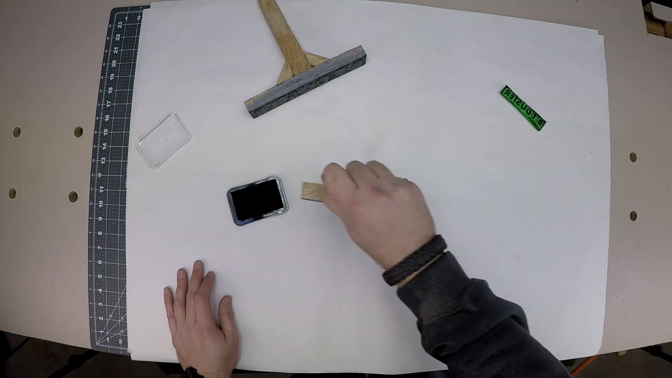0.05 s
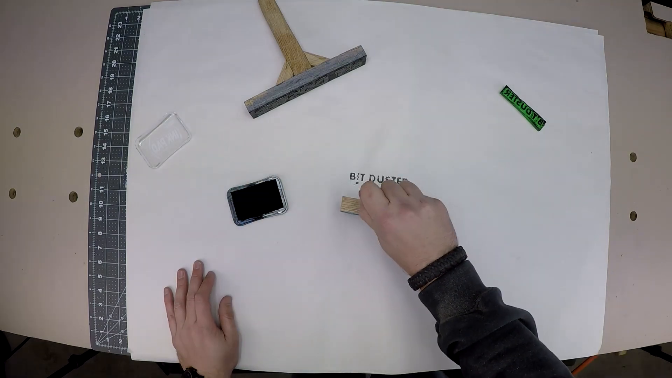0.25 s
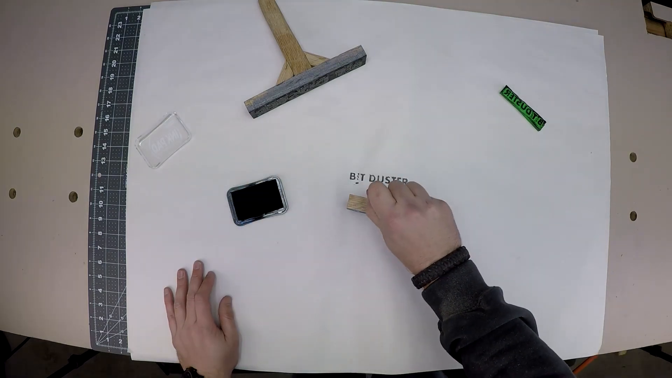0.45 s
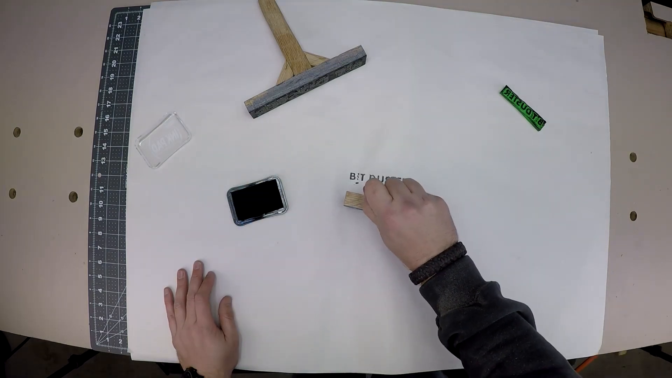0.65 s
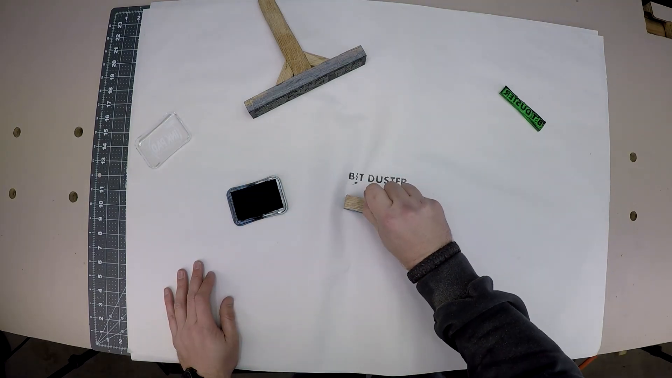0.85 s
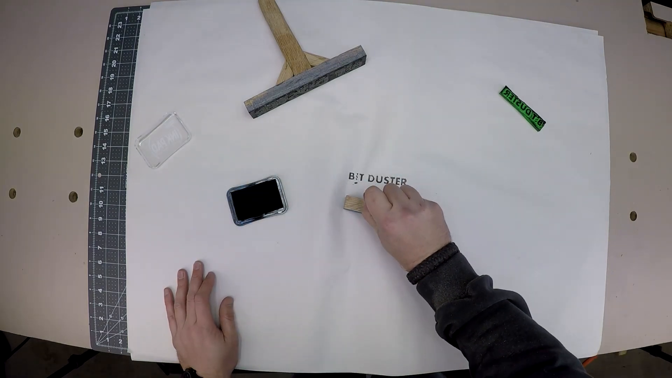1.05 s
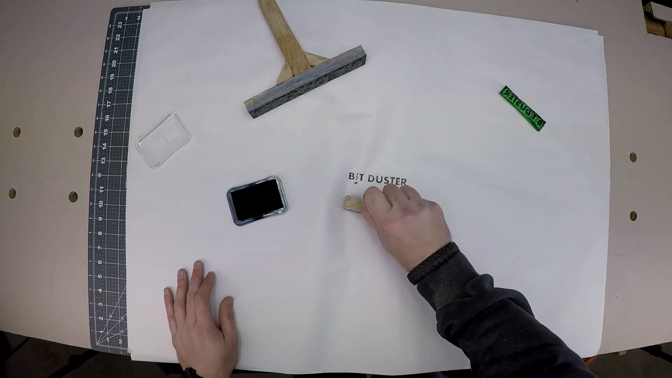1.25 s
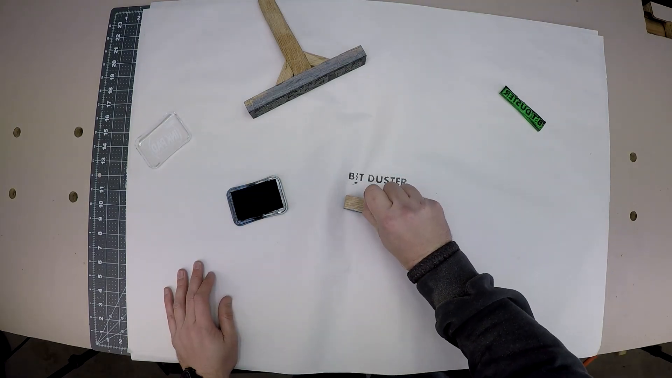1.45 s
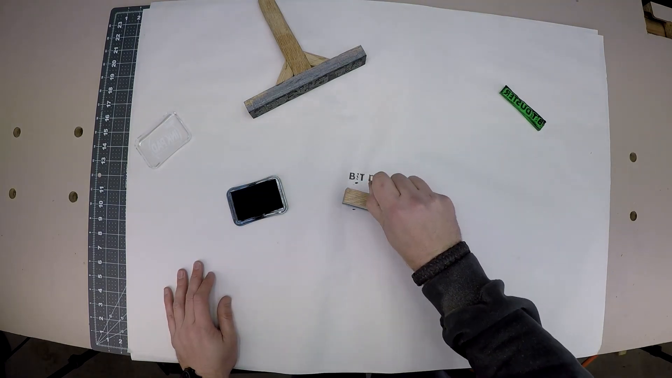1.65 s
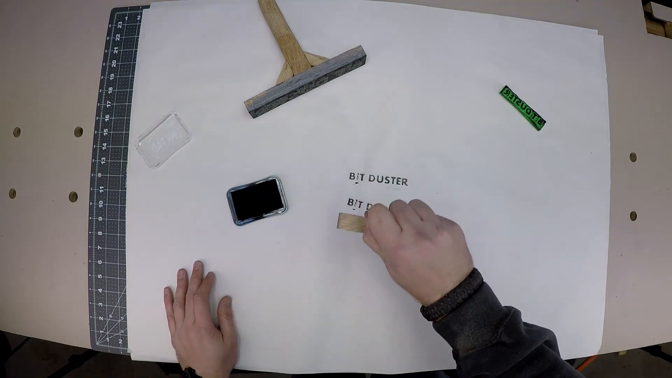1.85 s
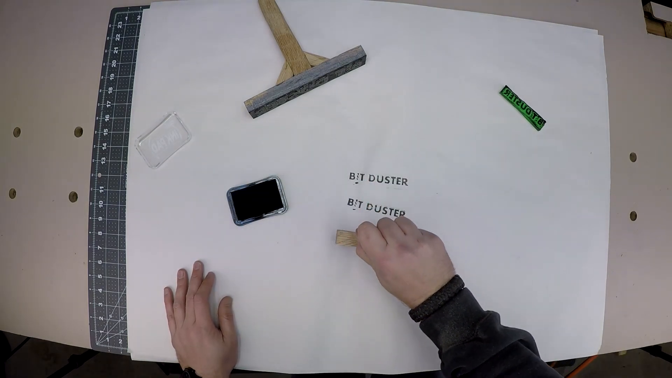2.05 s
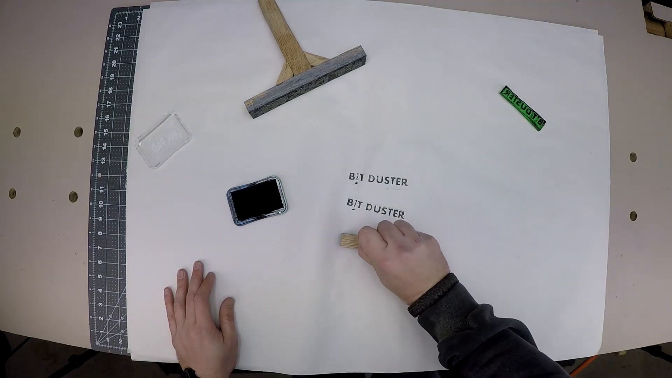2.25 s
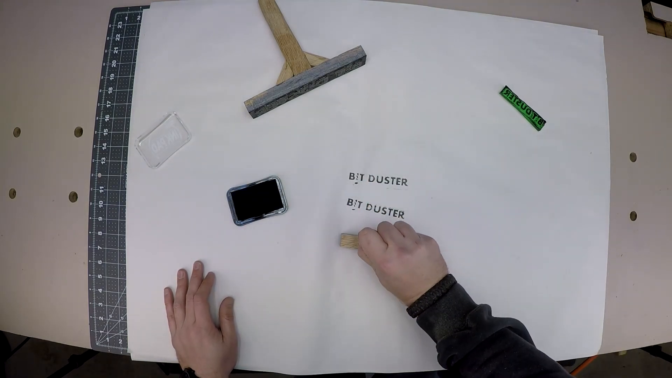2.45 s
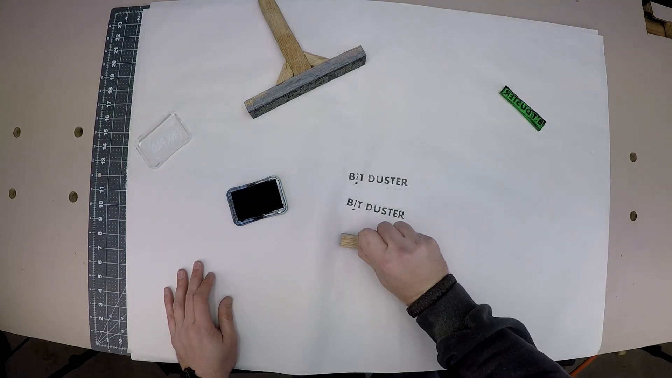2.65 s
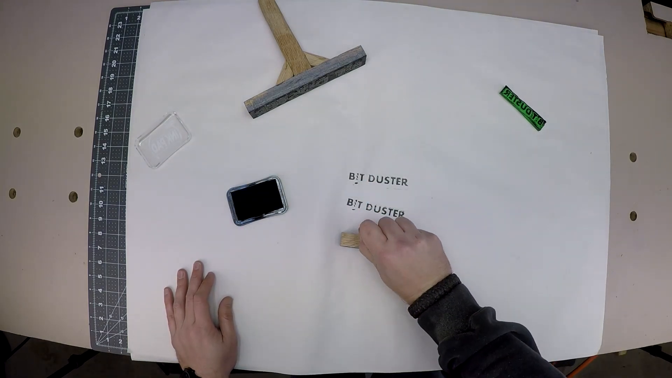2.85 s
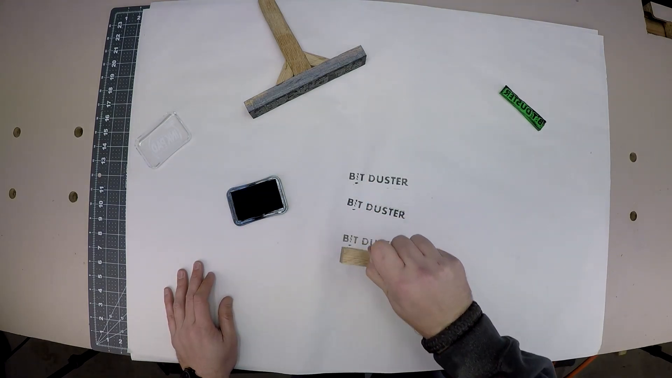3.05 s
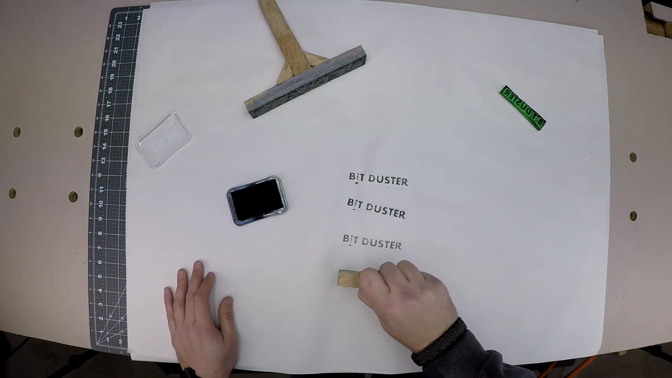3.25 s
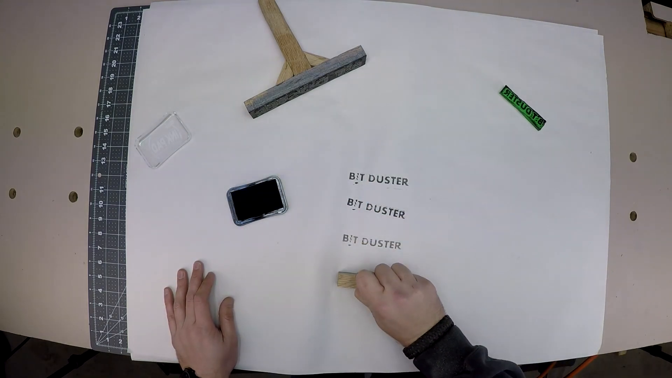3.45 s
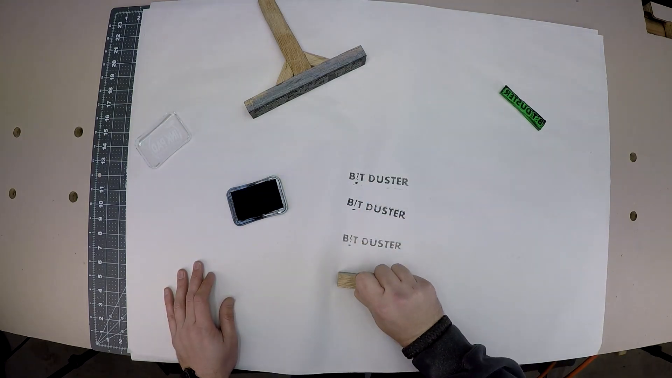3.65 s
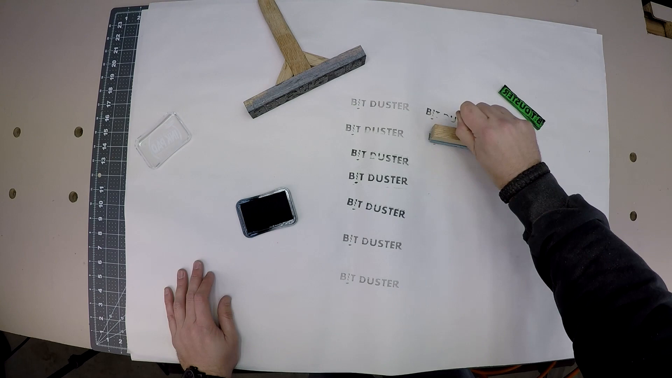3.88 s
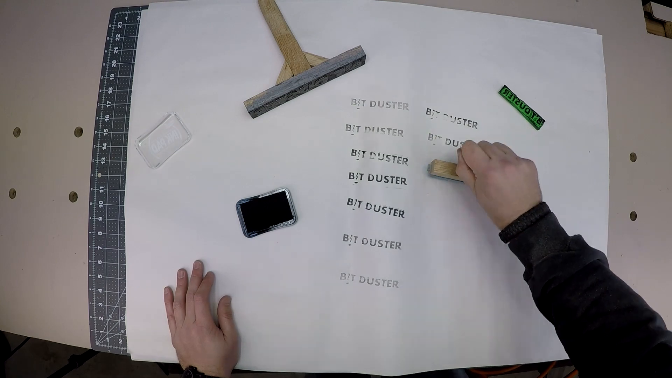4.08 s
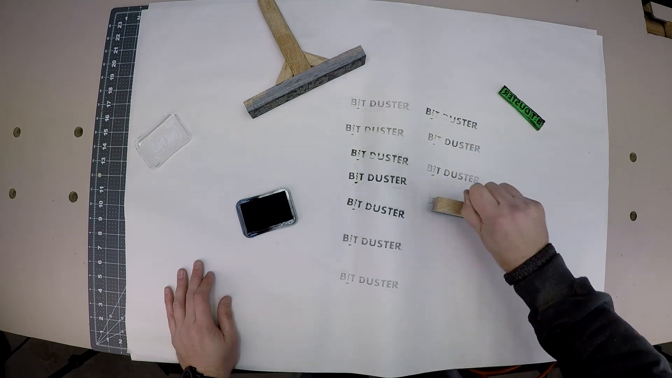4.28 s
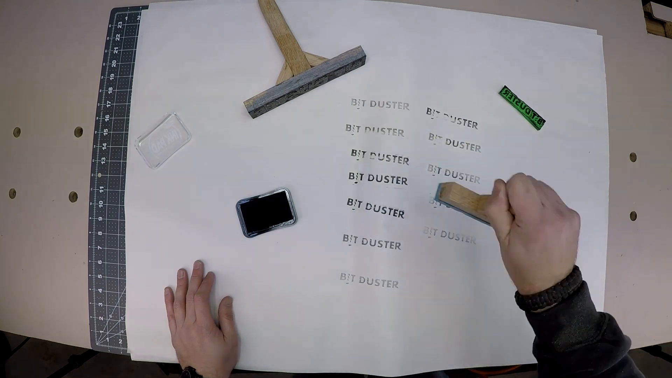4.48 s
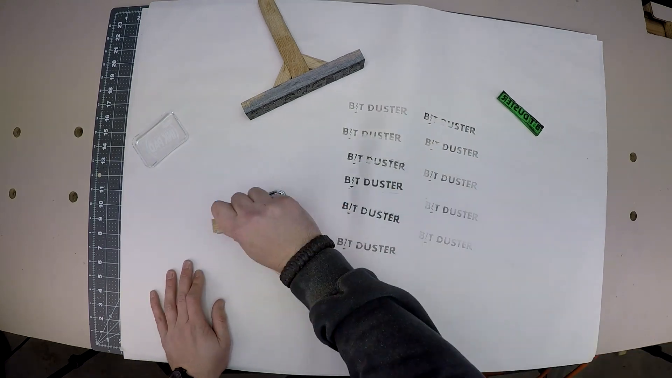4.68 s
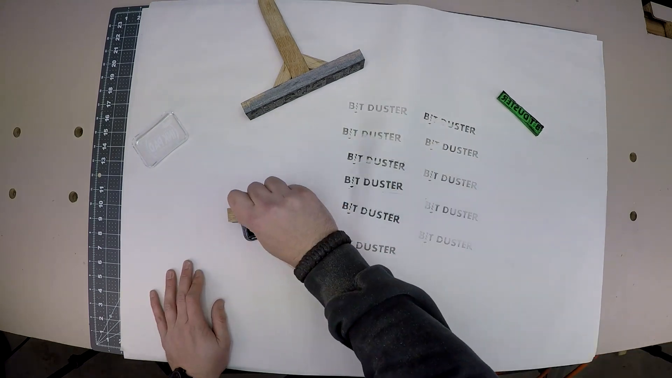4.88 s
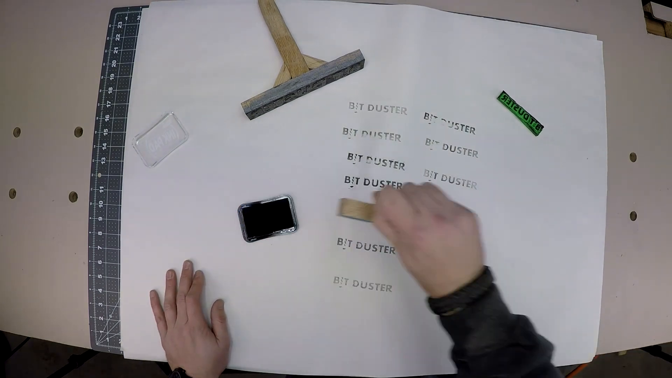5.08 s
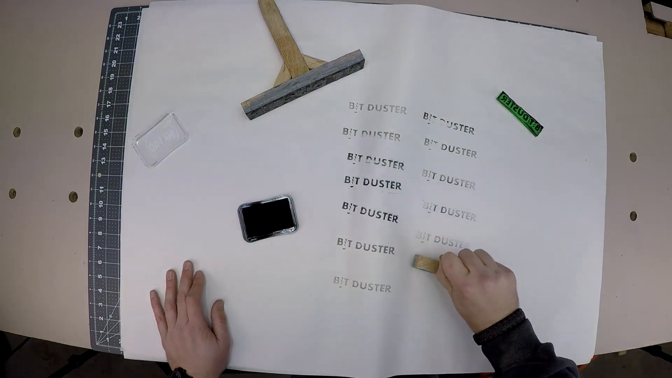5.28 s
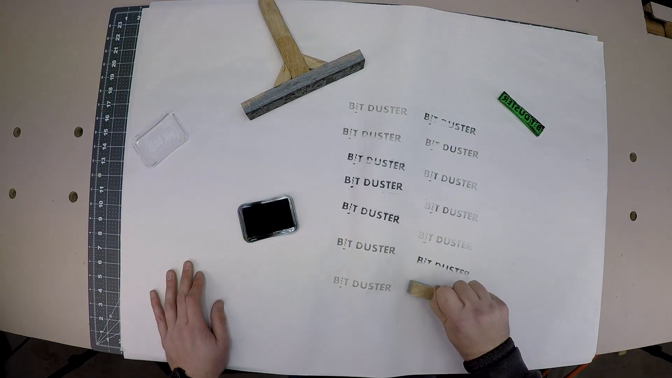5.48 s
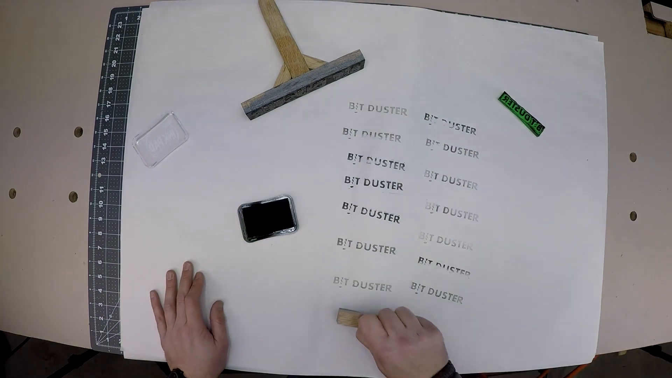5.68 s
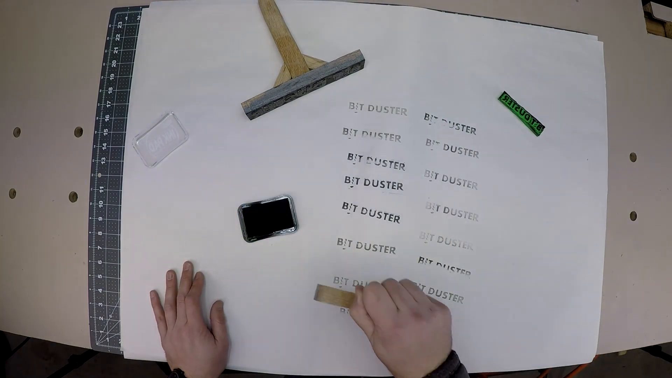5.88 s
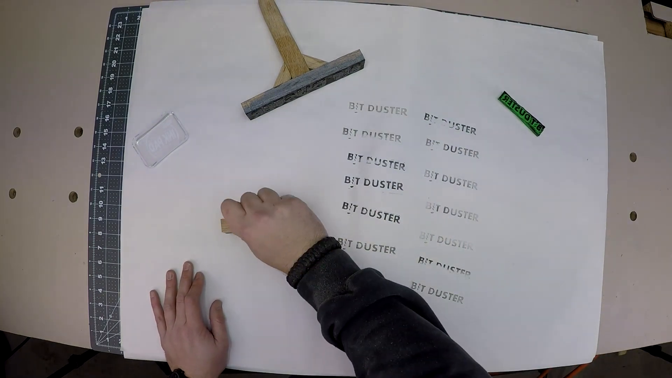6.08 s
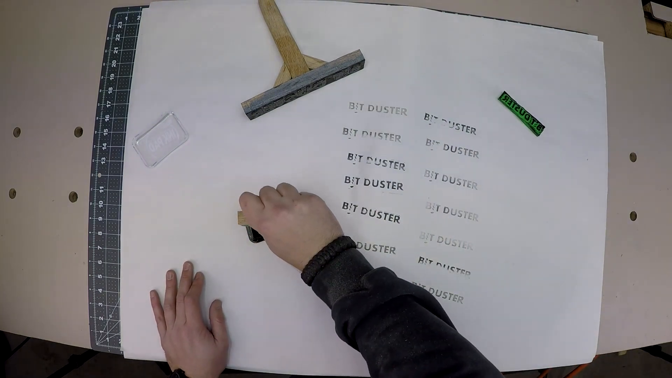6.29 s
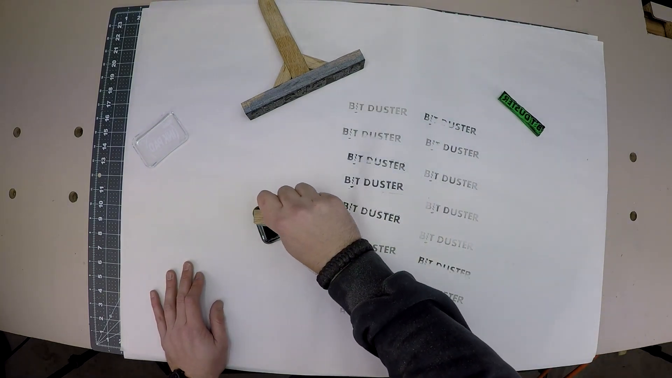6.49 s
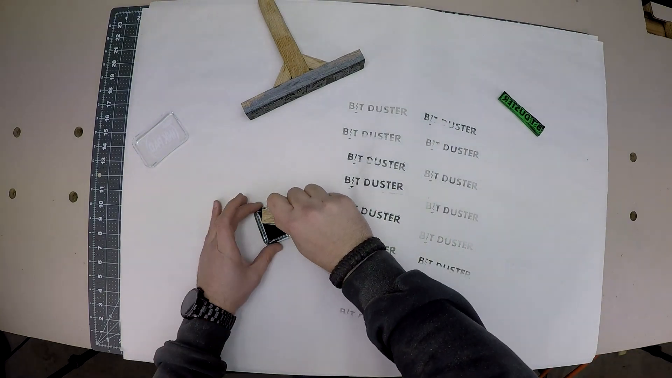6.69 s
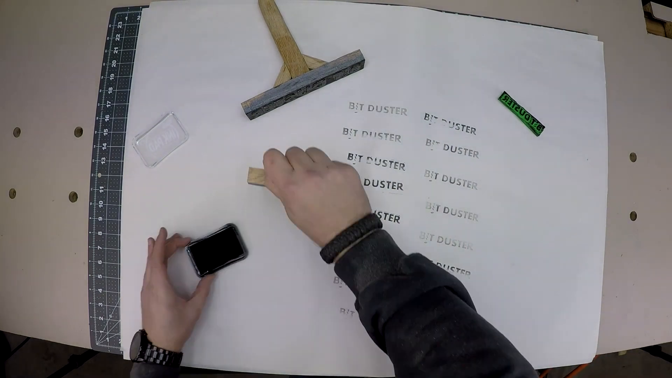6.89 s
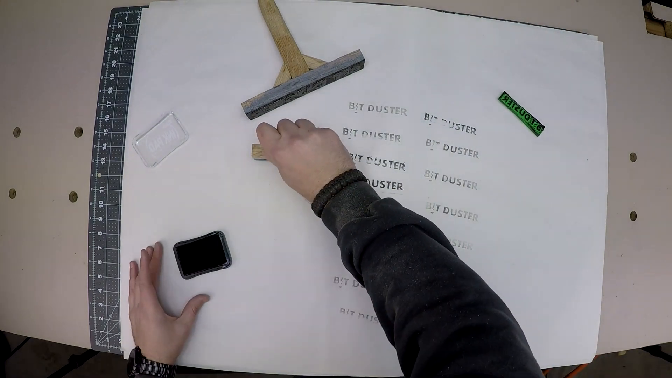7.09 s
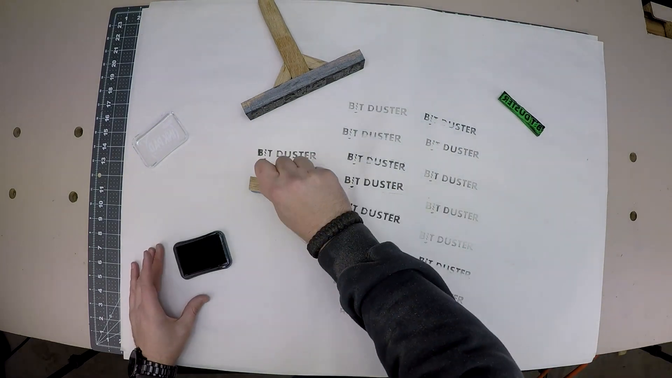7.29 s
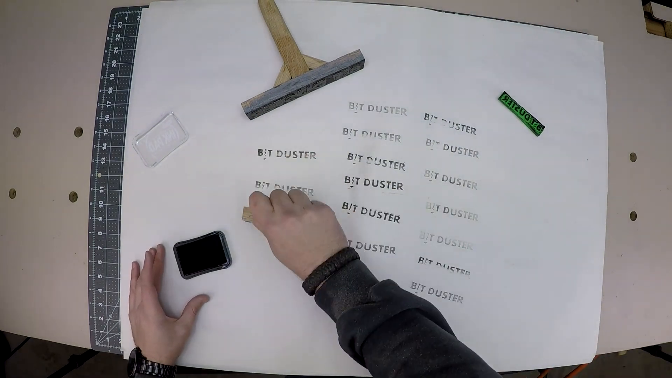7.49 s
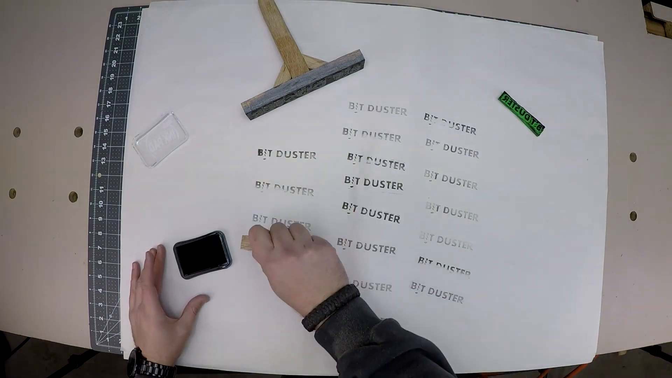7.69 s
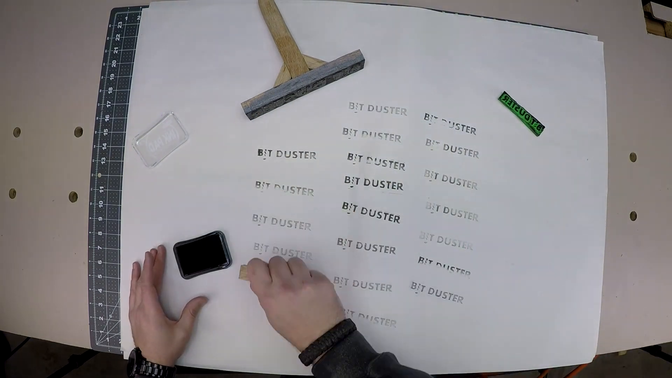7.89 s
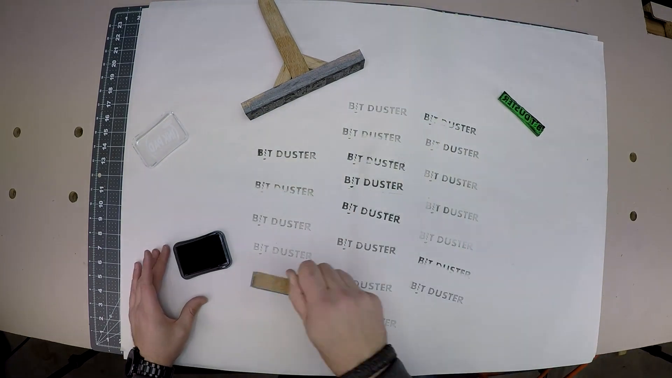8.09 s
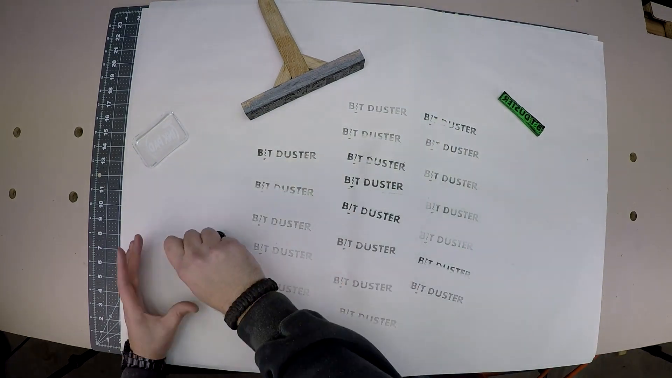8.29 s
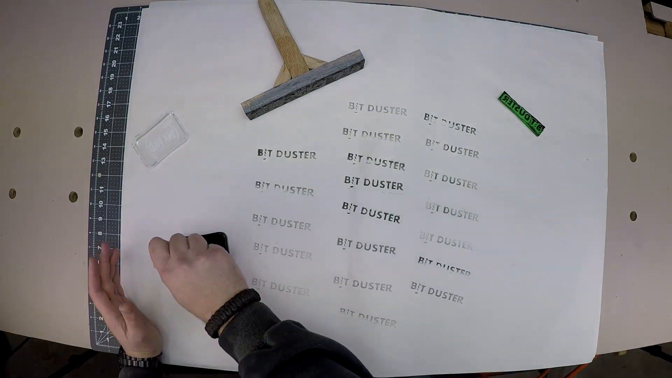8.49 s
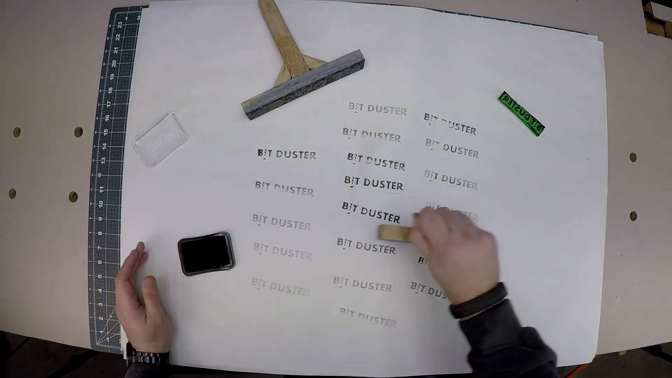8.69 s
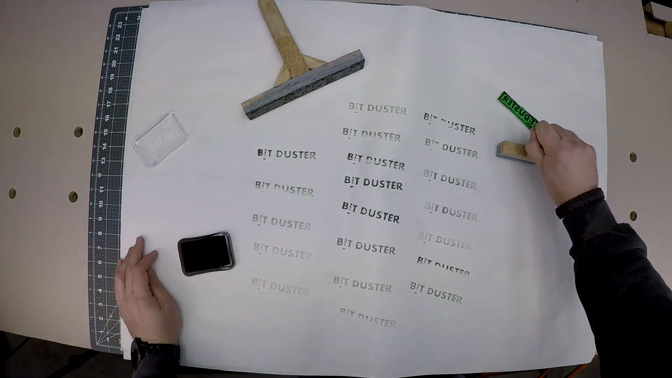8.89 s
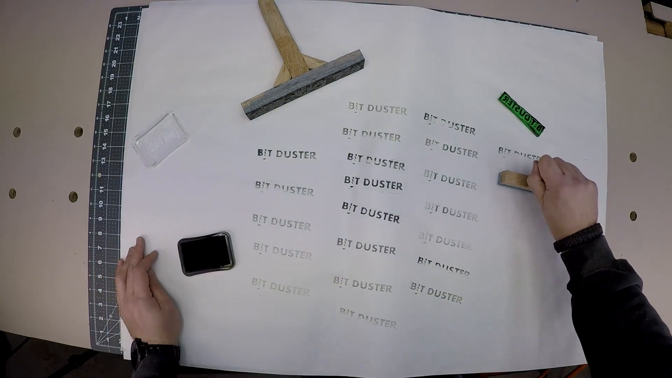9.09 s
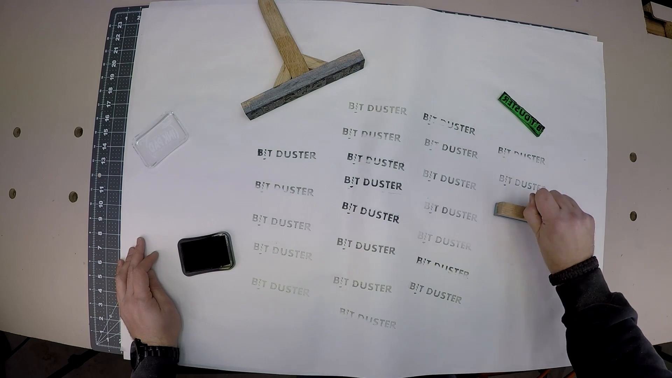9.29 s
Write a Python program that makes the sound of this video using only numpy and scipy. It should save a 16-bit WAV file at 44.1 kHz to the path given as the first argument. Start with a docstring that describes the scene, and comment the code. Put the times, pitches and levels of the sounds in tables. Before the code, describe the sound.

A steady low rumble with faint hiss lies under everything, heard close in a modest workshop. At 0.7 s a wooden rubber stamp strikes paper on a bench: sharp tick, flat slap, deep woody knock, brief ringing and room tail. Small scuffs and a tick come near 1.6 s, then equally firm blows at 2.1 and, slightly softer, 3.4 s. Three quicker, damped knocks follow at 3.9, 4.1 and 4.3 s, the last sharper. From 4.6 to 4.9 s the stamp patters on a felt ink pad in a plastic case. Knocks at 5.2, 5.4 and a heavier 5.7 s lead to a hard clack at 6.0 s and rapid soft dabs until 6.5 s. Scuffs and faint sleeve brushing precede five light, dull knocks from 7.0 to 7.9 s. More brushing and uneven dabs fill 8.2-8.6 s, then three brisk knocks at 8.8, 9.0 and 9.3 s.

```python
"""A low rumble with faint hiss runs throughout. A wooden rubber stamp hits paper on a workbench: three firm blows,
then quick light ones alternating with bouts of patter on an ink pad in a plastic case.
A blow sums grain-noise graze, slap and clack, damped-cosine knock and push, ringing bench modes and a room tail.
A dab sums a pat, a clack, a case thump, a push and a drag. Noise bursts make the ticks and scuffs around them;
soft brushing joins in the later part."""
import sys
import numpy as np
from scipy import signal
from scipy.fft import rfft, irfft, next_fast_len
from scipy.io import wavfile
from scipy.ndimage import uniform_filter1d

SR = 44100
rng = np.random.default_rng(int(sys.argv[2]) if len(sys.argv) > 2 else 0)


def wav_record(signal):
    """Record a signal, one row per channel, as 16-bit PCM in the file named by sys.argv[1]."""
    frames = np.transpose(np.atleast_2d(signal))
    bounded = np.clip(frames, -1, 1)
    # unit amplitude maps onto the largest positive 16-bit level
    quanta = np.round(bounded * 32767).astype(np.int16)
    wavfile.write(sys.argv[1], SR, quanta)


N = 411894

# All event and spectrum levels are relative: the layers below add their own offsets.
# Blows on paper: (time [s], bench push [dB], knock [dB], knock pitch [Hz], clack [dB], slap [dB])
BLOWS = [ (.679, -26.5, -32.5, 195, -33, -28.5), (2.081, -26.5, -27.5, 295, -26.5, -25.5),
         (3.353, -32, -31, 271, -35.5, -33), (3.935, -43.5, -35.5, 206, -43, -40.5),
         (4.122, -39, -35.5, 195, -42.5, -36.5), (4.313, -56, -27.5, 203, -30.5, -33),
         (5.202, -35, -37.5, 179, -44, -33.5), (5.422, -34.5, -38.5, 178, -40, -37.5),
         (5.674, -26.5, -27.5, 270, -42, -38.5), (6.969, -45, -38, 176, -66, -69),
         (7.231, -39, -36, 186, -57.5, -55.5), (7.47, -48, -40.5, 277, -62.5, -69),
         (7.686, -35, -35.5, 367, -52, -53), (7.883, -44.5, -32, 353, -49.5, -56),
         (8.83, -39.5, -32, 259, -51.5, -37), (9.044, -32, -32.5, 210, -40.5, -43),
         (9.255, -38, -35.5, 255, -56, -47.5)]
# Groups of blows sharing a clack pitch and a ring: (start [s], clack pitch [Hz], ring [share of free ring])
BLOW_GROUPS = [(0, 606, 1), (3.8, 1250, 0.41), (5.6, 520, 0.46), (8.7, 957, .42)]
# Dabs on the ink pad: (time [s], clack [dB])
PAD_DABS = [(4.612, -49), (4.661, -39.5), (4.758, -58), (4.818, -58), (4.928, -64), (5.969, -27.5),
            (6.027, -54), (6.08, -50), (6.139, -57), (6.197, -44.5), (6.241, -53.5), (6.377, -54),
            (6.434, -48), (6.484, -52), (8.233, -52), (8.309, -39), (8.356, -31.5), (8.424, -51.5),
            (8.48, -49), (8.541, -44), (8.555, -49)]
# Bouts of inking; in the last the other hand steadies the pad: (start [s], bench push [dB])
INKING_BOUTS = [(4.5, -40), (5.9, -44), (8.1, -50.5)]
# Felt pat against dab hardness: (level at a middling dab [dB], slope [dB per dB of clack])
PAT_LAW = (-64.5, 0.84)
# Case thump against dab hardness: (level at a middling dab [dB], slope [dB per dB of clack])
CASE_LAW = (-47, 0.88)
# Sharp ticks of wood and plastic: (time [s], level [dB], pitch [Hz], fade [s])
EDGE_TICKS = [(0.6654, -13.5, 2030, 0.00089), (.68, -35.5, 2150, 0.0036), (2.0841, -22, 2430, 0.0028),
              (1.592, -41, 3550, 0.00089), (1.675, -59, 3560, 0.0033), (4.313, -24.5, 1270, .0018),
              (5.969, -29.5, 2150, 0.0028)]
# Short scuffs, slides and a second slap, of rubber and case on paper or pad:
# (time [s], level [dB], pitch [Hz], length [s])
SHORT_CONTACTS = [(1.549, -50.5, 2030, .022), (1.605, -61.5, 1820, 0.027), (2.828, -61, 2020, 0.028),
                  (3.134, -65.5, 1740, 0.023), (4.238, -56, 1550, 0.017), (4.41, -54, 1520, 0.0093),
                  (4.495, -49.5, 1910, 0.029), (4.613, -54, 1850, 0.019), (5.214, -41, 2150, 0.015),
                  (5.54, -59, 1750, .006), (6.736, -62, 1096, 0.012), (6.886, -47.5, 1040, 0.013),
                  (6.929, -60, 3920, .02), (7.116, -44, 4620, 0.0066), (8.237, -49.5, 1440, 0.015)]
# Sleeve and hand brushing the sheet: (time [s], level [dB])
SLEEVE_BRUSHES = [(6.8, -74.5), (7.05, -72.5), (8.15, -72)]
# Bench-top modes: (frequency [Hz], level [dB], free t60 [s])
BENCH_MODES = [(53.7, -13.5, 0.91), (72.13, -12, 0.71), (117.3, -12, 0.36), (182, -5.5, 0.67),
               (275, -3.5, 0.47), (353, -5, 0.46), (404, -6.5, .55), (574, -8.5, 0.73), (718, -18, 1),
               (829, -8.5, .4), (990, -12.5, 0.66)]
# Workshop decay: (frequency [Hz], t60 before damping [s])
ROOM_DECAY = [(700, 0.62), (1300, 0.48), (4000, 0.5), (7000, 0.448), (14000, 0.03)]
# Soft face meeting paper or felt: (frequency [Hz], density [dB per Hz])
SLAP_SPECTRUM = [(200, -27), (650, -14.5), (1200, -12.5), (1900, -1), (2700, -5.5), (4300, -5.5),
                 (6300, -23), (9500, -24), (12500, -33), (16000, -51)]
# Steady room rumble and hiss: (frequency [Hz], density [dB per Hz])
RUMBLE_SPECTRUM = [(20, 3.5), (55, -10.5), (110, -2), (175, -9.5), (220, -22.5), (320, -18.5), (480, -23.5),
                   (900, -29), (2500, -32), (4000, -32.5), (6000, -38.5), (10500, -38.5), (15500, -44.5)]
# Block or case clack: (frequency [multiple of pitch], density [dB per Hz])
CLACK_SHAPE = [(.2, -23), (.5, -9), (.8, 4), (1.1, -0.5), (1.5, -3), (2.5, -16.5), (8, -68)]
# Hard-edge tick: (frequency [multiple of pitch], density [dB per Hz])
TICK_SHAPE = [(.15, 1), (.65, -15), (1, 11), (1.5, -5.5), (2.1, -8), (2.7, -20), (4, -23), (6, -31)]
# Rubbing and scuffing: (frequency [multiple of pitch], density [dB per Hz])
SCUFF_SHAPE = [(.2, -22), (.65, -4.5), (1, 6), (1.4, -6.5), (2.1, -4.5), (3.2, -17), (5.5, -17), (9, -28.5)]

LEAD_SAMPLES = SR // 8
T_S = (np.arange(SR) - LEAD_SAMPLES) / SR  # time around one contact
TOP_HZ = 15500
SLAP_LEAD_S = 0.0028  # rubber meets paper just before the block lands
MIDDLING_DAB_DB = -51.5  # louder dabs catch the case rim, softer ones sink into the felt
RISE_SHARE = 0.62  # share of a short contact's length spent building up


def amp(db):
    """Decibels to gain."""
    return 10 ** (np.asarray(db) / 20)


def along(points, hz):
    """Read (frequency, value) points on a log-frequency axis."""
    point_hz, values = np.transpose(points)
    return np.interp(np.log(hz + 1), np.log(point_hz), values)


def pitched(shape, hz):
    """Place a spectral shape around a pitch."""
    return [(multiple * hz, db) for multiple, db in shape]


def current(table, time_s):
    """Settings of the latest row begun by time_s."""
    begun = [row for row in table if row[0] <= time_s]
    return [table[0], *begun][-1][1:]


def add(track, time_s, sound):
    """Lay one contact into the track at its time."""
    start = round(time_s * SR) - LEAD_SAMPLES
    part = sound[:len(track) - start]
    track[start:start + len(part)] += part


def noise(spectrum, size):
    """Coloured noise of rms 1."""
    gain = amp(along(spectrum, np.fft.rfftfreq(size, 1 / SR)))
    x = irfft(rfft(rng.standard_normal(size)) * gain, size)
    return x / x.std()


def swell(rise_s, fade_s, lead_s=0, order=2):
    """Contact builds as faces meet, then dies away; high order: steep start, flat top."""
    t = T_S + lead_s
    rise = np.abs(np.minimum(t, 0) / rise_s) ** order
    fade = np.maximum(t, 0) / fade_s
    return np.exp(-rise - fade)


def burst(spectrum, envelope, grain_db):
    """Many tiny contacts of uneven strength, scaled to the envelope's energy."""
    grain_gain = amp(grain_db * rng.standard_normal(SR // 32 + 1))
    grains = uniform_filter1d(grain_gain.repeat(32)[:SR], size=16)
    x = noise(spectrum, SR) * grains * envelope
    return x * np.linalg.norm(envelope) / np.linalg.norm(x)


def thump(hz, cycles, rise_cycles):
    """Heavily damped swing of a struck body."""
    swing = np.sqrt(2) * np.cos(2 * np.pi * hz * T_S)
    return swing * swell(rise_cycles / hz, cycles / hz)


def room(x, ring, build_s):
    """Diffuse workshop answer to one contact; the highest treble dies first."""
    hz, frame_s, z = signal.stft(rng.standard_normal(SR), SR, nperseg=256)
    age_s = np.maximum(frame_s + T_S[0], 0)
    decay = amp(-60 * age_s / (ring * along(ROOM_DECAY, hz)[:, None]))
    tail = signal.istft(z * decay, SR, nperseg=256)[1][:SR]
    tail = tail * (1 - np.exp(-np.maximum(T_S, 0) / build_s))
    # sound arrives from all sides: only the contact's broad colour survives
    energy = np.cumsum(np.abs(rfft(x)) ** 2)
    k = np.arange(len(energy))
    half_width = k / 12 + 20
    band_energy = np.interp(k + half_width, k, energy) - np.interp(k - half_width, k, energy)
    colour = np.sqrt(np.abs(band_energy) / (2 * half_width))
    return irfft(rfft(tail) * colour, SR) * (T_S > 0) / np.linalg.norm(tail)


def bench(contact_hz, ring):
    """Bench top rings in beating pairs of modes; a soft contact reaches mainly the low ones."""
    hz, db, t60_s = np.transpose(BENCH_MODES)[:, :, None]
    t = np.maximum(T_S, 0)
    uneven_gain = amp(db + 2 * rng.standard_normal(hz.shape))
    strength = uneven_gain / np.sqrt(1 + (hz / contact_hz) ** 4)
    beat_hz = 11 * (.5 + rng.random(hz.shape))
    phase = 2 * np.pi * (hz * t + rng.random(hz.shape))
    beat_phase = 2 * np.pi * (beat_hz * t + rng.random(hz.shape))
    swing = np.sin(phase) + .5 * np.sin(phase - beat_phase)
    decay = amp(-60 * t / (t60_s * ring))
    return np.sum(strength * swing * decay, axis=0) * (1 - np.exp(-t / 0.0011))


def room_floor():
    """Steady rumble and hiss: stationary coloured noise."""
    return amp(-59) * noise(RUMBLE_SPECTRUM, next_fast_len(N))[:N]


def sleeve():
    """Cloth and hand brush the paper on the way to and from the pad."""
    track = np.zeros(N)
    for time_s, db in SLEEVE_BRUSHES:
        envelope = swell(rise_s=0.056, fade_s=0.1)
        add(track, time_s, amp(db) * burst(pitched(SCUFF_SHAPE, 2200), envelope, grain_db=5))
    return track


def handling():
    """Hard edges tick; rubber and case scuff, slide and once slap again, on paper or pad."""
    track = np.zeros(N)
    for time_s, db, hz, fade_s in EDGE_TICKS:
        tick = amp(db) * burst(pitched(TICK_SHAPE, hz), swell(0.000085, fade_s), grain_db=7.5)
        add(track, time_s, tick + amp(-25) * room(tick, ring=.36, build_s=0.00392))
    for time_s, db, hz, length_s in SHORT_CONTACTS:
        envelope = swell(RISE_SHARE * length_s, (1 - RISE_SHARE) * length_s)
        contact = amp(db) * burst(pitched(SCUFF_SHAPE, hz), envelope, grain_db=4.5)
        add(track, time_s, contact + amp(-18) * room(contact, ring=0.87, build_s=.004))
    return track


def inking():
    """Stamp pats the felt and rocks the case on the bench; hard dabs clack, soft ones thud."""
    track = np.zeros(N)
    for time_s, clack_db in PAD_DABS:
        hardness_db = clack_db - MIDDLING_DAB_DB
        pat_db, case_db = (db + slope * hardness_db for db, slope in (PAT_LAW, CASE_LAW))
        push_db = current(INKING_BOUTS, time_s)[0] - 0.039 * hardness_db
        contact_s = 0.0075 * amp(-.35 * hardness_db)  # harder dabs are over sooner
        case_hz = 430 * amp(0.16 * hardness_db) * np.exp(0.22 * rng.standard_normal())
        push_hz = 70 * np.exp(0.38 * rng.standard_normal())

        pat = amp(pat_db) * burst(SLAP_SPECTRUM, swell(contact_s, 1.04 * contact_s), grain_db=3.5)
        clack_envelope = swell(0.74 * contact_s, contact_s)
        clack = amp(clack_db - 5.5) * burst(pitched(CLACK_SHAPE, 636), clack_envelope, grain_db=9.5)
        case = amp(case_db) * thump(case_hz, cycles=0.91, rise_cycles=0.35)
        push = amp(push_db) * thump(push_hz, cycles=0.58, rise_cycles=0.76)
        # rubber rubs on felt
        drag = amp(-66.5) * burst(pitched(SCUFF_SHAPE, 800), swell(0.0067, 0.021), grain_db=11)
        direct = pat + clack + case + push + drag
        answer = amp(-16) * room(direct, ring=0.43, build_s=0.0017)
        wood = amp(push_db - 2.5) * bench(226, ring=0.28)
        add(track, time_s, direct + answer + wood)
    return track


def stamping():
    """Rubber grazes the paper and slaps it flat, then the block lands on the bench."""
    track = np.zeros(N)
    for time_s, push_db, knock_db, knock_hz, clack_db, slap_db in BLOWS:
        clack_hz, ring = current(BLOW_GROUPS, time_s)
        # an edge touches first, earlier in a slow, firm blow
        graze_envelope = swell(0.0033, 0.0097, lead_s=.016 * ring)
        graze = amp(slap_db - 11) * burst(pitched(SCUFF_SHAPE, 1740), graze_envelope, grain_db=1.5)
        slap_envelope = swell(0.0065, 0.0076, SLAP_LEAD_S, order=3)
        slap = amp(slap_db - 0.5) * burst(SLAP_SPECTRUM, slap_envelope, grain_db=3.5)
        clack_envelope = swell(0.0046, .0047, SLAP_LEAD_S / 2)
        clack = amp(clack_db + 3.5) * burst(pitched(CLACK_SHAPE, clack_hz), clack_envelope, grain_db=4)
        knock_cycles = 2.54 * ring * (knock_hz / 250) ** 2  # stiffer spots ring longer
        knock = amp(knock_db + 2) * thump(knock_hz, knock_cycles, rise_cycles=0.39)
        push = amp(push_db - 3) * thump(75, cycles=0.43, rise_cycles=0.32)

        # the hand damps a light, quick blow: it stirs bench and room less
        room_feed = amp(-14) * slap + amp(-10) * clack + amp(-11) * knock + amp(-9) * push
        answer = ring * room(room_feed, ring, build_s=0.0012)
        wood = amp(knock_db - 5) * np.sqrt(ring) * bench(1.55 * knock_hz, ring ** 1.74)
        add(track, time_s, graze + slap + clack + knock + push + answer + wood)
    return track


def scene():
    """Stamp, pad and paper over the room's steady rumble and hiss."""
    return (room_floor() + sleeve() + handling() + inking() + stamping())[None]


def record(dry):
    """High-pass the deepest bass at 30 Hz; cut everything from TOP_HZ up."""
    highpass = signal.butter(2, 30, "highpass", fs=SR, output="sos")
    x = signal.sosfilt(highpass, dry)
    size = next_fast_len(N + SR // 4)
    passed = np.fft.rfftfreq(size, 1 / SR) < TOP_HZ
    return irfft(rfft(x, size) * passed, size)[:, :N]


dry = scene()
out = record(dry)
wav_record(out)
```